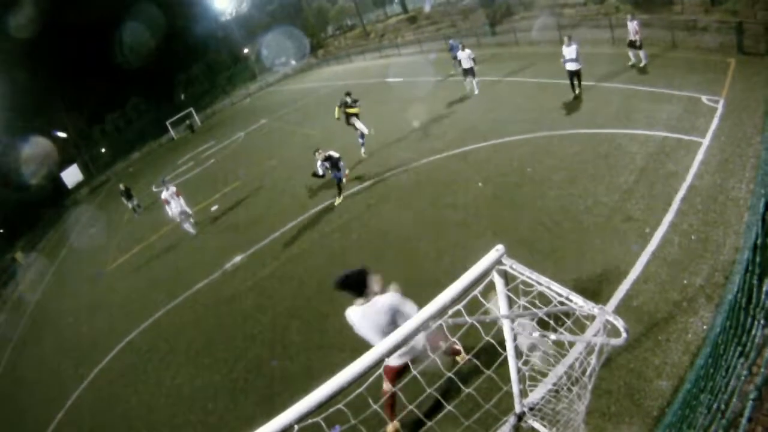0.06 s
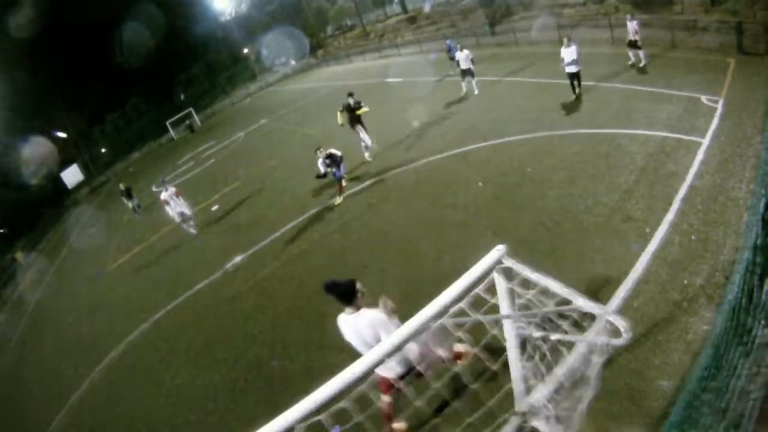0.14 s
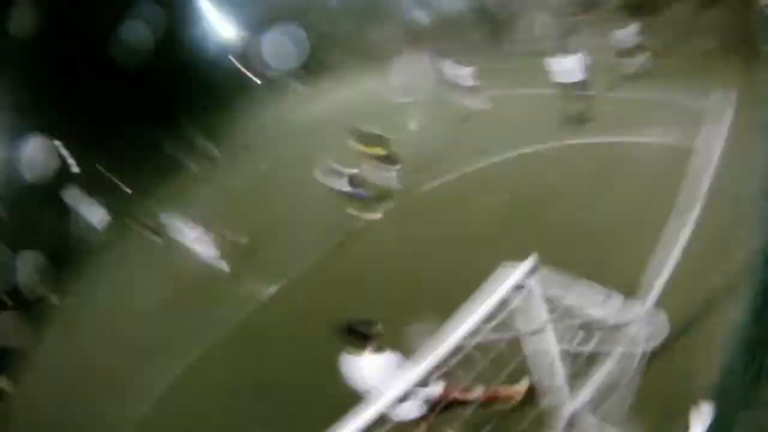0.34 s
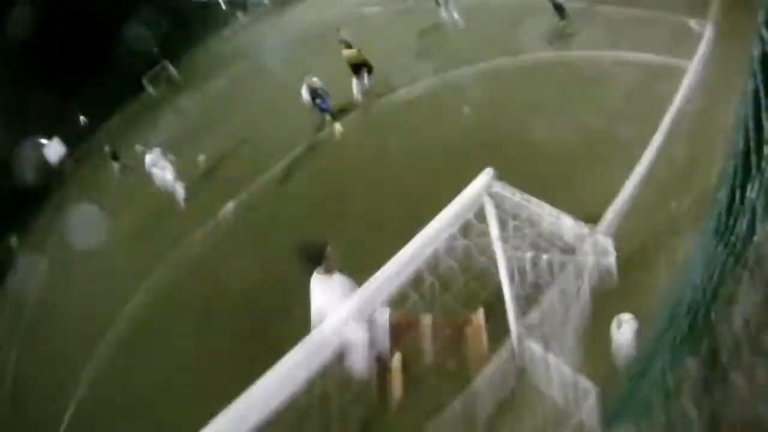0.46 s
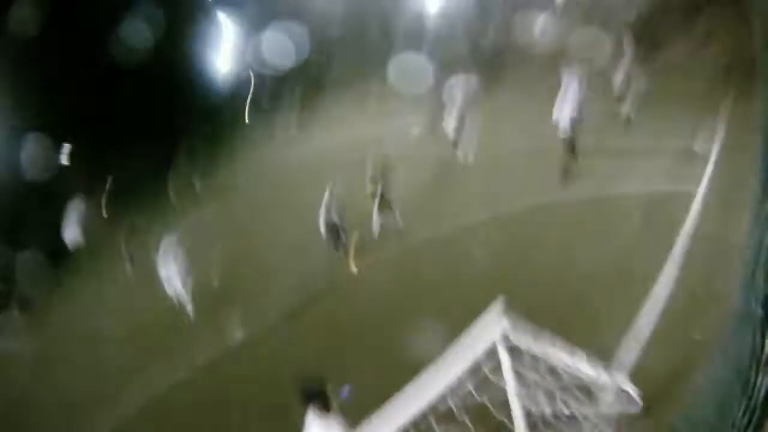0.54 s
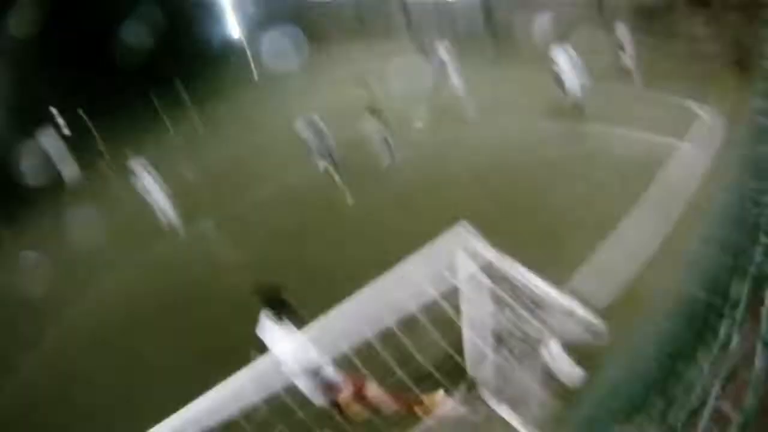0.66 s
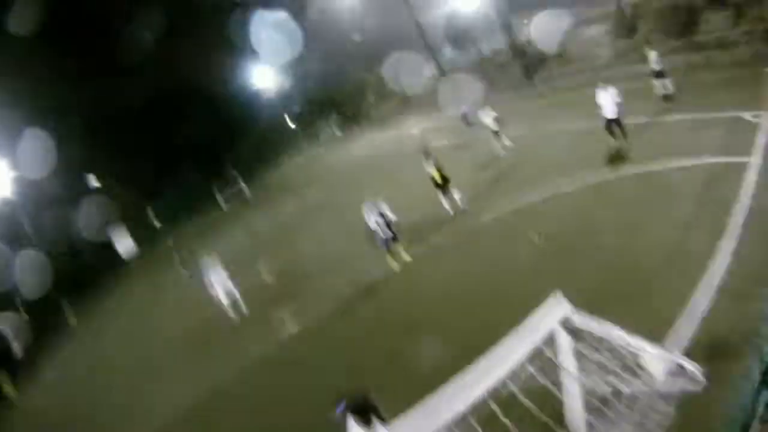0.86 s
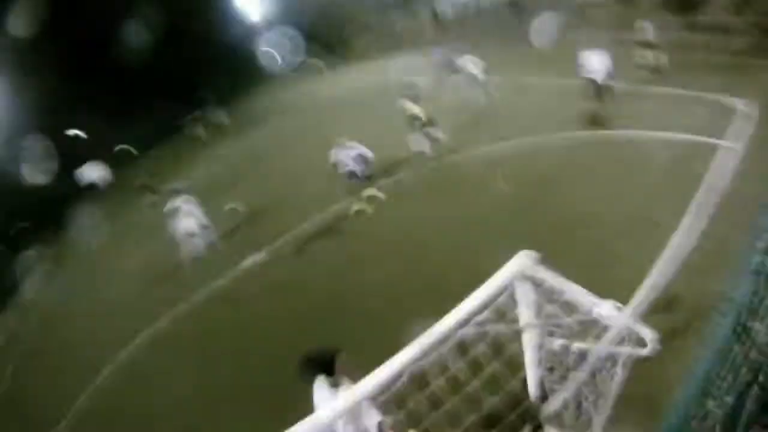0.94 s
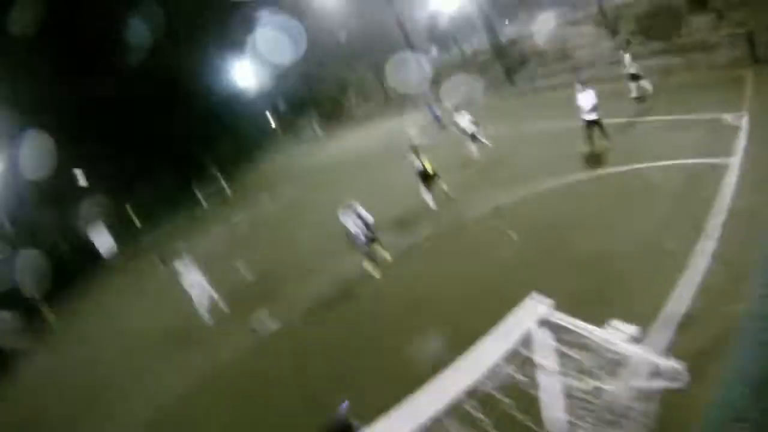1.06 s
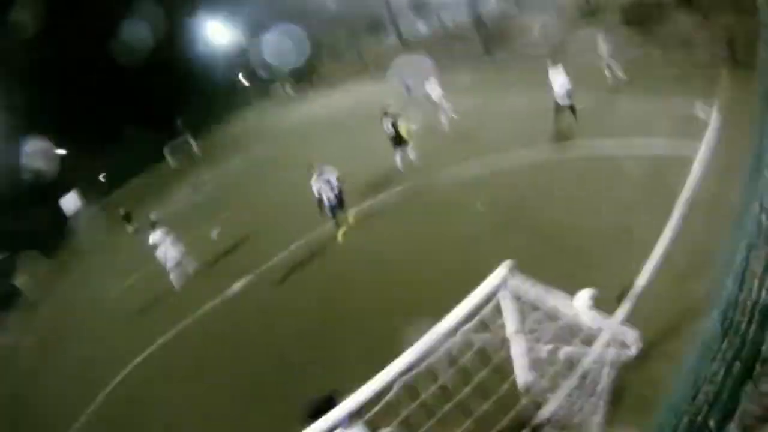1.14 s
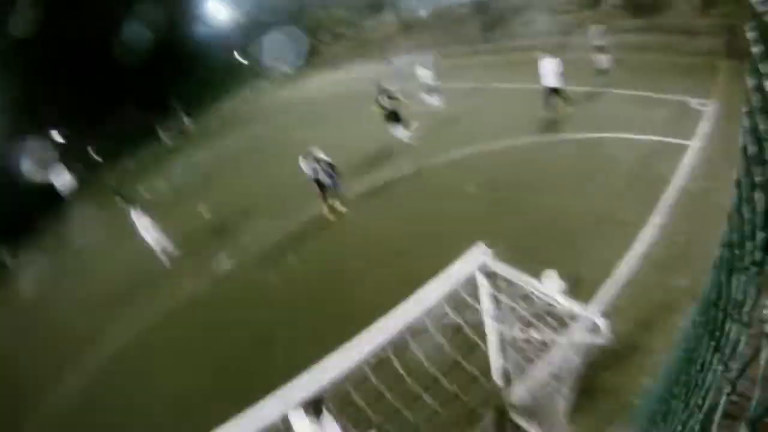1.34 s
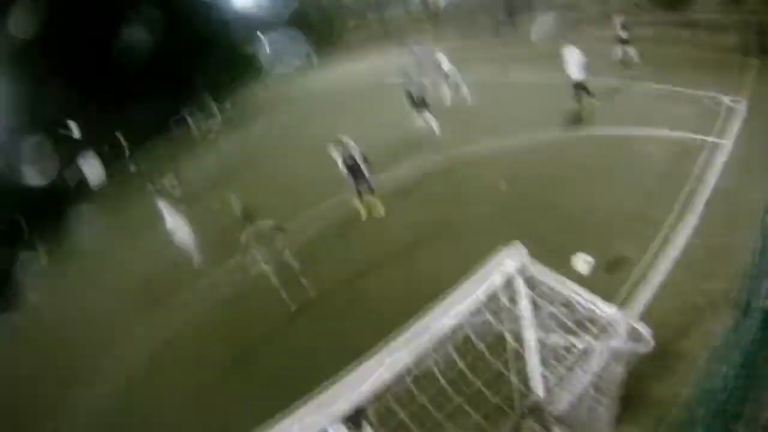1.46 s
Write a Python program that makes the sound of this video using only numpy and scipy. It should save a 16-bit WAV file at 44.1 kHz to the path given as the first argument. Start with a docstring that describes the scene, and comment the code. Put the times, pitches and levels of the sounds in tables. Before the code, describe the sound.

On an outdoor pitch at night, a ball brushes the net and hits the goal with a thump. Close, sometimes distorted plastic knocks and scrapes follow from the shaken camera mount, fading along with a low hum and air rumble.

```python
"""On an outdoor pitch at night, a football hisses over the net, then thumps into the goal. The blow shakes a
camera's mount: for about a second the plastic housing knocks, judders and rubs against its bracket, and the
hardest hits overload the camera's converter. Meanwhile the support drones and the swinging camera stirs the
air. It all dies down toward the faint hush of the night."""
import sys
import numpy as np
from scipy import signal
from scipy.fft import rfft, irfft
from scipy.io import wavfile

SR = 44100
rng = np.random.default_rng(int(sys.argv[2]) if len(sys.argv) > 2 else 0)


def materialize(psi):
    """Save the field psi as 16-bit PCM at rate SR to the path in sys.argv[1].

    A 1-D psi becomes a single channel; in a 2-D psi each row is a channel.
    """
    bounded = np.clip(np.atleast_2d(psi).T, -1, 1)
    quanta = np.round(bounded * 32767).astype(np.int16)
    wavfile.write(sys.argv[1], SR, quanta)


N = 66150
TIME = np.arange(N) / SR
HIT_S = .234  # when the ball strikes
REBOUND_S, REBOUND_DB = .003, -14  # each contact bounces once, later and weaker


def thumps():
    """The ball's blow and the later jolts: low pushes whose pitch sags as the frame gives."""
    # blows through the frame: (time [s], level [dB], starting pitch [Hz], fade time [s])
    blows = [(0.2351, -6, 140, 0.0073), (0.284, -22, 251, 0.0039), (0.4957, -14.5, 149, 0.0023),
             (0.71, -24.5, 275, 0.019), (0.916, -32.5, 127, 0.021), (1.096, -31.5, 240, 0.0049),
             (1.372, -35.5, 145, 0.0093), (1.421, -46.5, 340, 0.033)]
    rise_s, sag_s, sag_to = .0012, .008, .32
    out = np.zeros(N)
    for s, db, hz, fade_s in blows:
        cycles = np.cumsum(hz * (sag_to + (1 - sag_to) * np.exp(-TIME / sag_s))) / SR
        swell = (1 - np.exp(-TIME / rise_s)) * np.exp(-(TIME / fade_s) ** 2 / 2)
        add(out, s, -amp(db) * swell * np.sin(2 * np.pi * cycles))
    return out


def knocks(size=1764):
    """The housing hits its bracket: a brief gritty contact and a weaker bounce set it ringing."""
    # hits on the bracket: (time [s], relative level [dB], sharpness [dB], hollowness [dB])
    hits = [(0.2328,-30,5,-21), (0.2423,-10.5,-9,-16.5), (0.2466,-15,-19,-6), (0.2501,-6,-27,-30),
            (.270,-9,-42,-28), (0.2737,-16,-27,-10), (0.284,-12,-38,-2), (0.2916,-15,-23,-9),
            (0.3062,-26,1,4), (0.3429,-16.5,-11,-22), (0.349,-24,-3,2), (0.354,-26.5,7.5,3),
            (0.375,-25,1,0.5), (0.3902,-27,1.5,-1.5), (0.4134,-14,-1,-19), (0.423,-22,-9,-27),
            (0.4816,-19.5,2,0.5), (0.499,-17.5,-41,-1), (0.5264,-23.5,-21,-18), (0.5613,-22,-6,-12.5),
            (0.588,-38,20.5,-24), (0.6328,-21.5,1,-13), (0.638,-11.5,-11.5,-30), (0.645,-15,-9,-11),
            (0.6837,-17,-30,-32), (0.6895,-32,0.5,4), (0.701,-18,1,-2.5), (0.7083,-19.5,0.5,-5),
            (0.7127,-6.5,-7,-23), (0.722,-14.5,4,-5), (0.728,-12,-0.5,-4.5), (0.7369,-9.5,-9.5,-10.5),
            (0.7405,-31,-22,4), (0.7602,-16.5,-21.5,-6), (.839,-20.5,-38,-13.5), (0.9472,-26,9,-6),
            (0.9586,-29.5,-33.5,2), (0.9735,-31,-6,-25), (0.998,-34.5,-35,1.5), (1.0992,-16.5,-52,-1.5),
            (1.104,-33.5,-33,12), (1.111,-34.5,-25,2.5), (1.194,-33.5,1.5,-6), (1.259,-20.5,-9.5,-8),
            (1.468,-50.5,-37,6.5)]
    contact_s, release_s = .0014, .0002
    t, out = np.arange(size) / SR, np.zeros(N)
    press = lambda u: (u >= 0) * np.exp(-np.maximum(u - contact_s, 0) / release_s)
    contact = press(t) + amp(REBOUND_DB) * press(t - REBOUND_S)
    for s, db, sharp_db, hollow_db in hits:
        add(out, s, amp(db - 12) * housing(contact * rng.standard_normal(size), sharp_db, hollow_db))
    return out


def judders(size=1764):
    """Pressed hard, the housing sticks and slips at a clear pitch, grates, and bounces once."""
    # hard contacts: (time [s], level [dB], pitch [Hz], length [s], relative grit [dB], hollowness [dB])
    contacts = [(0.3089,4,2069,0.0029,-9,3.5), (0.4662,-8,1716,0.0015,-1.5,-8), (.568,-5,1977,0.0016,4,-15),
                (0.5932,-4.5,1860,0.0011,-1,-10.5), (0.6043,0,2013,.0027,-4,-15),
                (0.6203,0,2010,0.0014,-12,-20), (0.718,1,1980,0.0019,-2,-12.5),
                (0.768,-1.5,3457,0.002,-5.5,-13), (0.916,-13.5,2595,0.0021,1.5,-14.5),
                (1.1709,-13,2270,.0018,-0.5,-13.5), (1.227,-2.5,3226,.0019,-1.5,-17),
                (1.364,-20,1620,0.0015,-14,5)]
    rise_s, fade_s = .00029, .00028
    t, out = np.arange(size) / SR, np.zeros(N)
    for s, db, hz, length, grit_db, hollow_db in contacts:
        press = lambda u: np.clip(u / rise_s, 0, 1) * np.exp(-np.maximum(u - length, 0) / fade_s)
        slip = (press(t) + amp(REBOUND_DB) * press(t - REBOUND_S)) * np.sin(2 * np.pi * hz * t)
        sharp_db = 12 * np.log2(hz / 2970)  # higher pitch, sharper grit
        grit = housing((t < length) * rng.standard_normal(size), sharp_db, hollow_db)
        grit -= slip * (grit @ slip) / (slip @ slip)  # the grit lies on either side of the pitch
        add(out, s, amp(db) * (slip + amp(grit_db - 13.5) * grit))
    return out


def rubbing():
    """Tiny slips and smooth friction in the bracket make the housing ring, with a little hiss."""
    # rubbing between knocks: (time [s], relative level [dB])
    strength = [(.232,-54), (.238,-24.5), (.254,-27), (.258,-35), (.268,-33), (.272,-28), (.298,-30.5),
                (.325,-37), (.338,-45), (.36,-33.5), (.385,-32.5), (.405,-45), (.43,-31), (.46,-35),
                (.495,-26.5), (.52,-35), (.542,-43.5), (.6,-21), (.63,-27.5), (.672,-40.5), (.72,-21),
                (.755,-37), (.79,-48), (.82,-49), (.86,-34), (.885,-47.5), (.91,-35.5), (.935,-47),
                (.965,-38), (.987,-51), (1.003,-49), (1.04,-57.5), (1.07,-46.5), (1.1,-34.5), (1.13,-54),
                (1.155,-39.5), (1.19,-49), (1.215,-27.5), (1.245,-49), (1.3,-57.5), (1.355,-53),
                (1.375,-51.5), (1.42,-48.5), (1.455,-61.5), (1.472,-52), (1.5,-56)]
    slips_per_s, spread_db = 1600, 3
    slips = (rng.random(N) < slips_per_s / SR) * rng.choice([-1, 1], N)
    slips = slips * amp(spread_db * np.minimum(rng.exponential(1, N), 4))
    friction = rng.standard_normal(N)
    crackle = evened(housing(slips, sharp_db=-6.5, hollow_db=-3))
    scrape = amp(-7) * evened(housing(friction, sharp_db=-3, hollow_db=-5.5))
    hiss = amp(-9.5) * evened(friction)
    return amp(1) * level(strength) * (TIME > HIT_S) * evened(crackle + scrape + hiss)


def housing(push, sharp_db, hollow_db):
    """The plastic rings: sharp contacts favour its high tones, hollow ones its low tones."""
    # the housing's own tones: (pitch [Hz], level [dB], sharpness share [0-1], hollowness share [0-1])
    tones = [(771, -8, 0.02, 0.81), (1109, -1, 0.06, 1), (1402, -1, 0.13, 0.4), (1738, -1, 0.01, 0.32),
             (2041, 0, 0.02, 0.11), (2446, -1.5, 0.42, 0.06), (2598, -1, 0.78, 0.02), (3288, -1.5, 1, 0),
             (3609, -2.5, 1, 0.01), (5040, -8.5, 0.41, 0.04)]
    out = 0
    for k, (hz, db, sharp, hollow) in enumerate(tones):
        tone = evened(ring(push, hz, fade_s=.0095 * (2000 / hz) ** .33))  # high tones die sooner
        out += (-1) ** k * amp(db + sharp * sharp_db + hollow * hollow_db) * tone
    return out


def mount(x, fade_s=.053):
    """The mount rings on faintly after each contact."""
    tail = rng.standard_normal(N) * amp(-60 * TIME / fade_s)
    return x + amp(-30) * signal.fftconvolve(x, tail / np.linalg.norm(tail))[:N]


def shell(x):
    """Sound carried through the housing loses deep bass and some treble."""
    # what the housing lets through: (frequency [Hz], level [dB])
    colour = [(60, -21.5), (250, 1), (520, -3.5), (900, -2), (3700, -1), (4300, -4), (5200, -8.5),
              (6000, -4.5)]
    return coloured(x, colour)


def support_drone():
    """The struck support hums in its own low tones."""
    # the support's tones: (pitch [Hz], width [Hz], level [dB]); wider tones die sooner
    tones = [(163, 62, -11.5), (308, 70, -4.5), (359.5, 22.7, -2), (701, 66, -9.5)]
    # strength of the hum: (time [s], level [dB])
    strength = [(.232,-74), (.24,-24), (.265,-44), (.288,-26), (.31,-33.5), (.335,-56), (.36,-35.5),
                (.41,-53.5), (.445,-39.5), (.53,-54), (.61,-37.5), (.67,-53.5), (.725,-27.5), (.8,-64),
                (.87,-45.5), (1,-58.5), (1.055,-89), (1.1,-39.5), (1.14,-67), (1.19,-64), (1.225,-40),
                (1.295,-76.5), (1.37,-57.5), (1.5,-67)]
    push = rng.standard_normal(N)
    hum = sum(amp(db) * evened(ring(push, hz, np.log(1000) / np.pi / width)) for hz, width, db in tones)
    return level(strength) * hum * (TIME > HIT_S)


def stirred_air():
    """Air rumbles against the camera as it swings."""
    # shaking of the support: (time [s], level [dB])
    strength = [(0, -67), (.11, -62), (.228, -66), (.24, -27.5), (.3, -18), (.335, -43.5), (.49, -31),
                (.56, -39.5), (.72, -36.5), (.8, -35.5), (.92, -43), (1.03, -44.5), (1.1, -44),
                (1.16, -39.5), (1.23, -41.5), (1.31, -54), (1.39, -46), (1.5, -61.5)]
    # colour of the rumble: (frequency [Hz], level [dB])
    colour = [(15, -11), (35, 5), (62, -1), (130, -6.5), (220, -14), (450, -30.5), (900, -24), (3000, -93)]
    return level(strength) * noise(colour)


def net_brush():
    """The ball hisses over the cords just before the blow."""
    # ball touching the net: (time [s], level [dB])
    strength = [(.184,-101), (.186,-43), (.1965,-38), (.1975,-28.5), (.2,-35), (.2027,-28.5), (.209,-43),
                (.22,-54), (.26,-74)]
    # colour of the hiss: (frequency [Hz], level [dB])
    colour = [(300,-24), (1000,-16.5), (2000,-16), (2700,-3), (3500,4), (4300,-17), (5200,-4), (6000,-25.5)]
    return level(strength) * noise(colour)


def night_air():
    """The open air makes a faint, steady hush."""
    # colour of the hush: (frequency [Hz], level [dB])
    colour = [(15, -21.5), (25, -1), (86, -6), (193, -8.5), (410, -10), (495, -16.5), (614, -11),
              (1380, -13.5), (2180, -9.5), (2630, -15.5), (5150, -20), (6050, -33)]
    return amp(-62.5) * noise(colour)


def amp(db):
    """Turns decibels into a multiplier."""
    return 10 ** (np.asarray(db) / 20)


def evened(x):
    """Scales a sound to an average strength (rms) of 1."""
    return x / np.sqrt(np.mean(x ** 2) + 1e-20)


def level(curve):
    """A volume curve from rows of (time [s], level [dB])."""
    return amp(np.interp(TIME, *np.transpose(curve)))


def add(mix, s, sound):
    """Mixes a sound in, starting at s seconds."""
    part = mix[max(round(s * SR), 0):][:len(sound)]
    part += sound[:len(part)]


def coloured(x, points, size=4096):
    """Turns parts of a sound up or down by rows of (frequency [Hz], level [dB])."""
    hz, db = np.transpose(points)
    log_hz = np.log(abs(np.fft.fftfreq(size, 1 / SR)) + 1)
    log_gain = np.log(amp(np.interp(log_hz, np.log(hz + 1), db)))
    response = np.exp(np.conj(signal.hilbert(log_gain)))  # nothing rings before its cause
    taps = np.fft.ifft(response).real[:size // 2]
    return signal.fftconvolve(x, taps)[:len(x)]


def noise(colour):
    """Noise of strength 1 with a given colour (balance of low and high)."""
    return evened(coloured(rng.standard_normal(2 * N), colour)[N:])


def ring(x, hz, fade_s):
    """One tone set ringing by x; it falls 60 dB in fade_s seconds."""
    pole = np.exp((2j * np.pi * hz - np.log(1000) / fade_s) / SR)
    return signal.lfilter([1], [1, -pole], x).imag


def scene():
    """All sources, the same in both channels."""
    rattle = shell(mount(knocks() + judders()) + rubbing())
    mono = thumps() + rattle + support_drone() + stirred_air() + net_brush() + night_air()
    return np.array([mono, mono])


def record(dry):
    """The camera's slow converter holds each sample, adding fizzy treble; hard hits overload it."""
    input_hz, hold_hz, top_hz = 5850, 12000, 15650
    narrow = signal.oaconvolve(dry, signal.firwin(101, input_hz, fs=SR)[None], "same")
    mirrored = narrow * (1 + 2 * np.cos(2 * np.pi * hold_hz * TIME))  # copies the sound into the treble
    held = irfft(rfft(mirrored) * np.sinc(np.fft.rfftfreq(N, 1 / SR) / hold_hz), N)
    overloaded = np.clip(held, -1, 1)
    treble_cut = signal.firwin(511, top_hz, window=("kaiser", 8), fs=SR)
    return signal.oaconvolve(overloaded, treble_cut[None], "same")


dry = scene()
out = record(dry)
materialize(out)
```